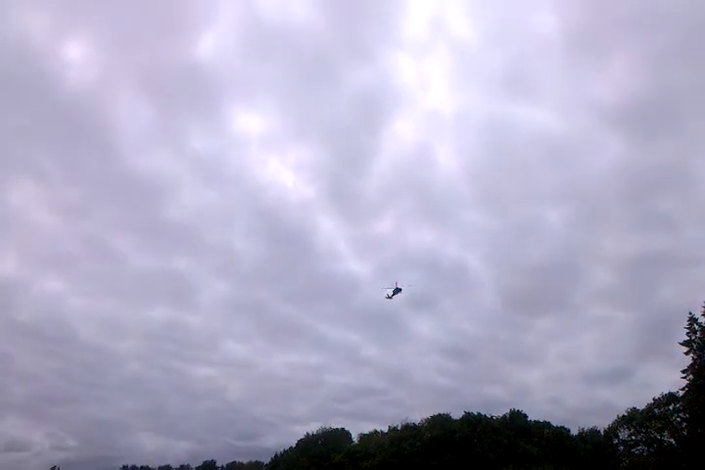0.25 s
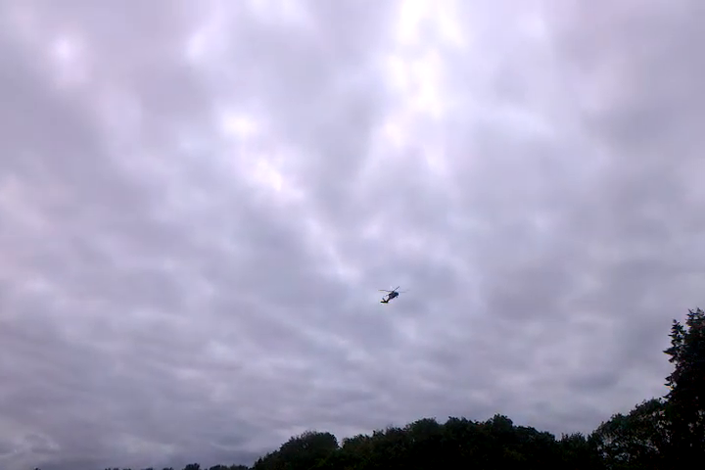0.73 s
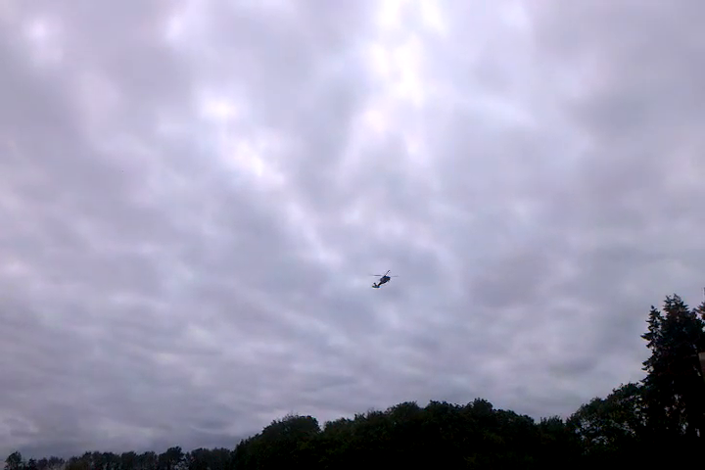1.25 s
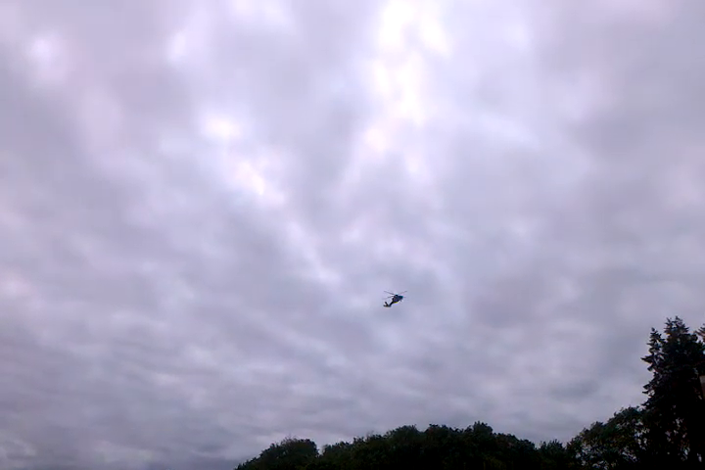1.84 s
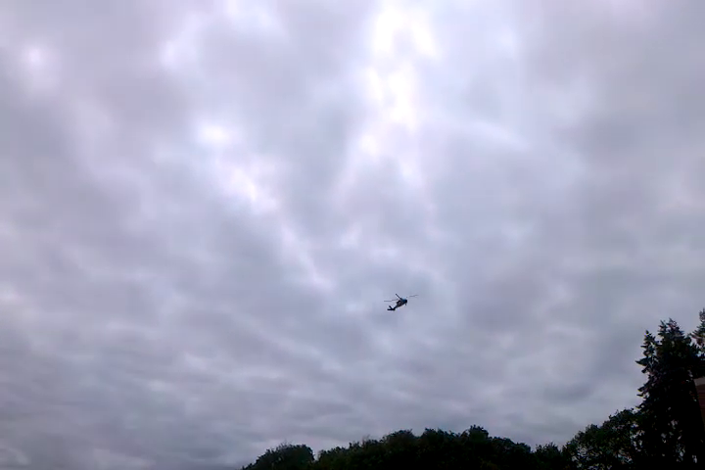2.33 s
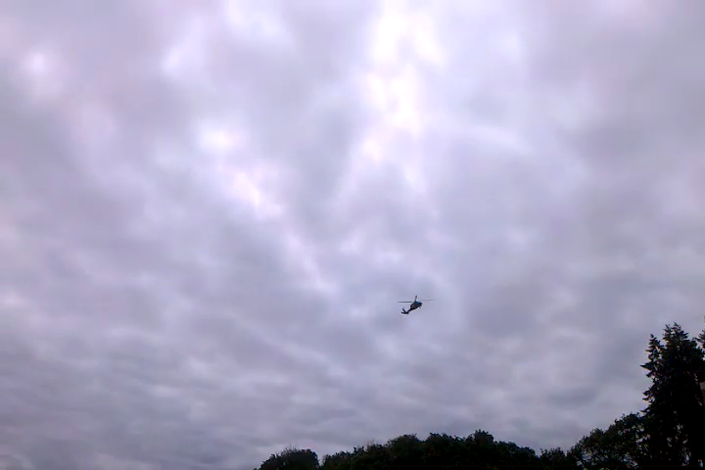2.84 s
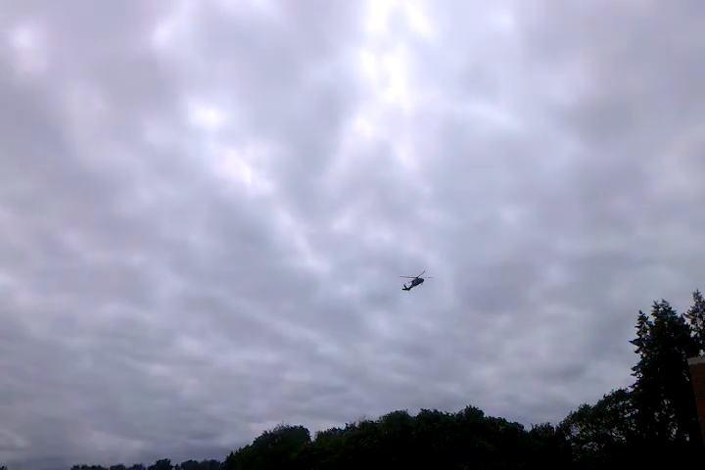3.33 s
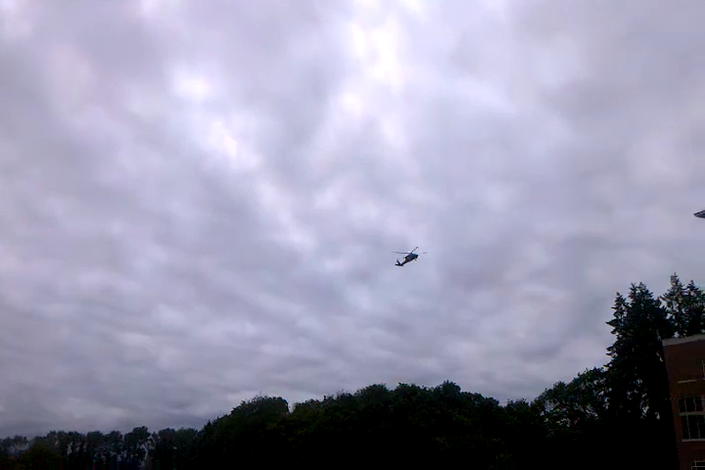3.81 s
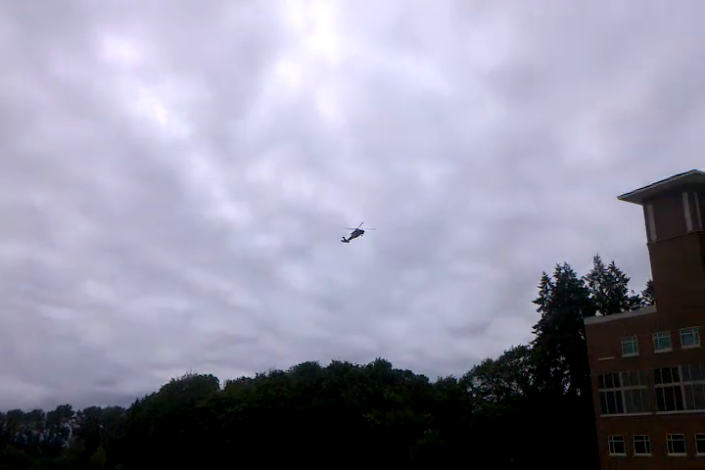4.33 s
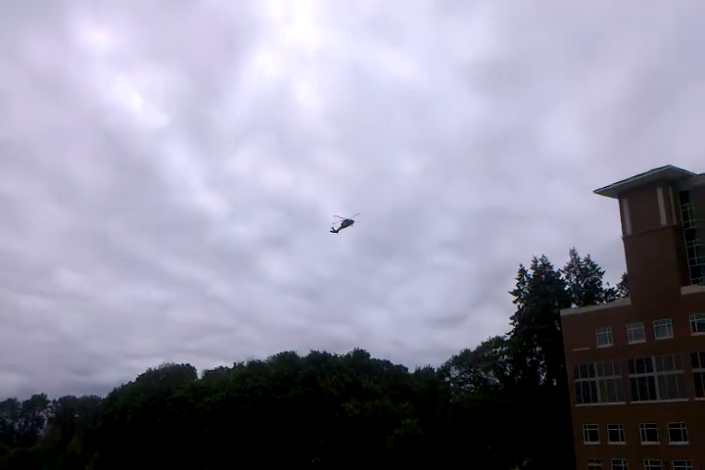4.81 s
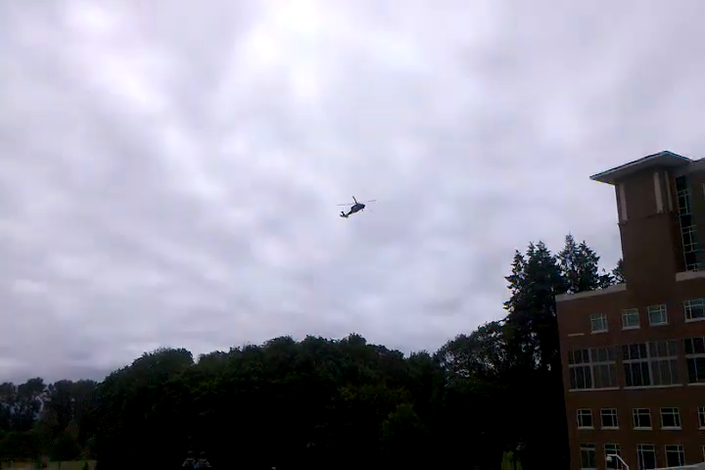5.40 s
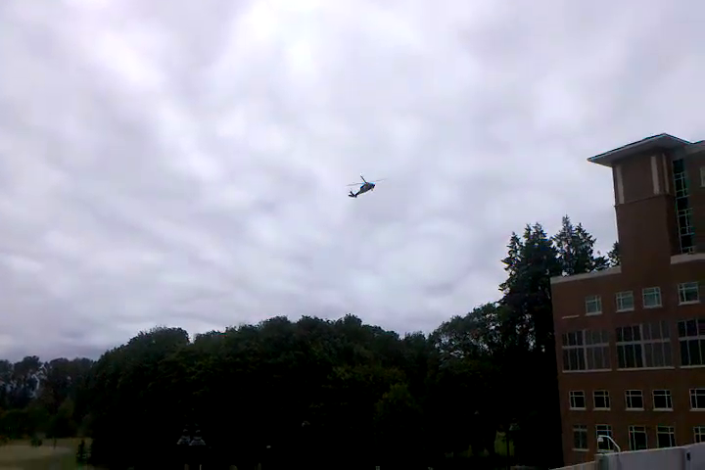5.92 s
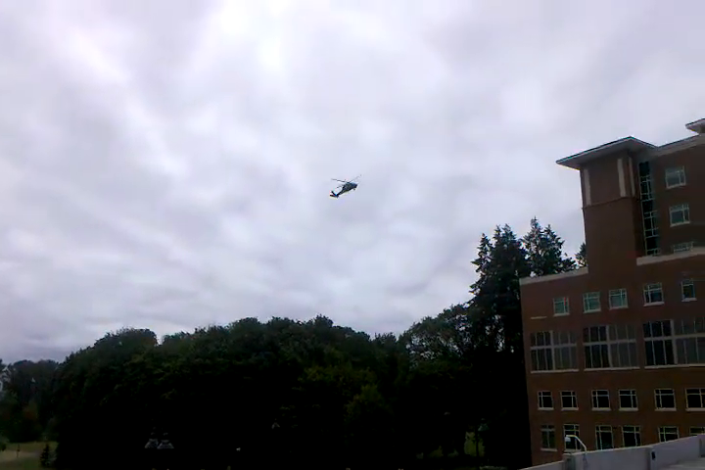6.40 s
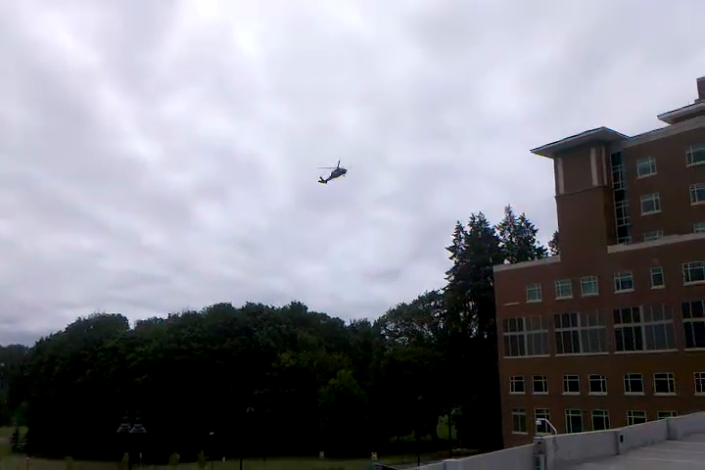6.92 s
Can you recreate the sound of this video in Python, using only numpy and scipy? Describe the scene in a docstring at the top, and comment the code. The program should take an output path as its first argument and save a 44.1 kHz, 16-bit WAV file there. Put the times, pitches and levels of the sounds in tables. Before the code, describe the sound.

Rapid helicopter blade thumps grow louder and sharper as it draws nearer outdoors, with rushing air, low rumble and a faint whine.

```python
"""A four-bladed helicopter comes slowly nearer under cloud and hovers beside a tall building.
Each blade pass sends a thump; where a blade cuts the vortex of the one before, it sharpens into
a slap and a rasp. Rotor wash, exhaust roar, hiss and a thin turbine whine fill the gaps over a low
rumble; the ground, trees and walls answer. Light air brushes the microphone, and two faint scuffs pass."""
import sys
import numpy as np
from scipy import signal
from scipy.fft import rfft, irfft, next_fast_len
from scipy.io import wavfile
from scipy.ndimage import uniform_filter1d, map_coordinates

SR = 44100
rng = np.random.default_rng(int(sys.argv[2]) if len(sys.argv) > 2 else 0)


def transcribe(u):
    """Save the signal u as a 16-bit wav file named by the first command-line argument.

    u: samples, shape (n,) or (channels, n), limited to [-1, 1]; the rate is SR.
    q: integer samples, one column per channel.
    """
    v = np.clip(np.atleast_2d(u).T, -1, 1)
    q = np.round(v * 32767).astype(np.int16)
    wavfile.write(sys.argv[1], SR, q)


N = 315315

BLADE_HZ, FIRST_PASS_S = 18.067, .0485
# Travel time to the listener. Each row: time in seconds, delay in ms relative to the close hover.
TRAVEL_DELAY = [(0, 26.3), (1.5, 9), (2.4, .8), (3, -1), (4.4, 1.2), (5.2, .5), (6, 1), (6.5, 4),
                (7.15, 11)]
# The four blades track unevenly. Each row is one blade: loading offset in dB, slap offset in dB.
BLADE_OFFSETS = [(-1, -1.5), (-7.5, -0.5), (0, -2), (-1.6, -1.5)]
# The beat limps most while far away. Each row: time in seconds, multiplier on the loading offsets.
UNEVENNESS = [(0, 1.5), (2.5, 1.2), (3.5, 0.29), (7.15, 0.4)]
# How strongly the rotor carries. Each row: time in seconds, base levels in dB of beat, wash and rumble.
ROTOR_LEVELS = [(0.15, -35, -32, -46.5), (.42, -34.5, -36.5, -49), (.85, -33.5, -35, -44.5),
                (1.7, -33.5, -35.5, -54.5), (2.3, -35.5, -36.5, -48.5), (2.65, -32.5, -35, -47),
                (3.15, -36.5, -37.5, -45), (3.8, -30.5, -30.5, -42), (4.3, -32.5, -31.5, -44.5),
                (4.7, -29.5, -30, -45.5), (5.45, -28.5, -28, -40.5), (5.97, -29, -27.5, -38.5),
                (6.15, -33, -31.5, -37.5), (6.38, -35.5, -32.5, -37.5), (6.7, -36, -34.5, -43.5),
                (7.15, -32, -33.5, -42.5)]


def amp(db):
    return 10 ** (np.asarray(db) / 20)


def unit_rms(x):
    return x / np.sqrt(np.mean(x ** 2) + 1e-20)


def along(points, hz):
    """Read (Hz, value) points on a log frequency axis."""
    point_hz, values = np.transpose(points)
    return np.interp(np.log(hz + 1), np.log(point_hz + 1), values)


def curves(rows, at=None):
    """Each column after the time, at the given times or at every sample."""
    times, *columns = np.transpose(rows)
    return [np.interp(np.arange(N) / SR if at is None else at, times, column) for column in columns]


def wobble(knots_per_s):
    """A smooth random curve."""
    knots = rng.standard_normal(int(N * knots_per_s / SR) + 4)
    return map_coordinates(knots, [np.arange(N) * knots_per_s / SR])


def filtered(x, response):
    """Shape x by a gain given as a function of Hz."""
    size = next_fast_len(N + SR // 2)
    return irfft(rfft(x, size) * response(np.fft.rfftfreq(size, 1 / SR)), size)[:N]


def rush(spectrum, patchy_db):
    """Noise of rms 1, coloured by (Hz, dB) points, with drifting patches of random gain."""
    bins = signal.stft(rng.standard_normal(N), nperseg=1024)[2]
    patches = uniform_filter1d(rng.standard_normal(bins.shape), size=4, axis=0)
    patches = uniform_filter1d(patches, size=12, axis=1)
    noise = signal.istft(bins * amp(patchy_db * unit_rms(patches)), nperseg=1024)[1][:N]
    return unit_rms(filtered(noise, lambda hz: amp(along(spectrum, hz))))


def spells(rows, at, attack_s=.14, release_s=.1):
    """A gain for each dB column: every spell fades in, holds from start to end and lets go."""
    start, end, *levels_db = np.transpose(rows)[:, :, None]
    gate = np.clip(1 + (at - start) / attack_s, 0, 1) * np.clip(1 - (at - end) / release_s, 0, 1)
    return [(amp(db) * gate).max(0) for db in levels_db]


def pulse_of(gain, causal_share, lead):
    """A pulse for each row of spectral gains: a brief build, a peak at sample lead, then a ring."""
    cepstrum = irfft(np.log(gain + 1e-7))
    half = cepstrum.shape[1] // 2
    cepstrum[:, 1:half] *= 1 + causal_share
    cepstrum[:, half + 1:] *= 1 - causal_share
    return np.roll(irfft(np.exp(rfft(cepstrum))), lead, axis=1)


def pass_times():
    """When each blade pass arrives; the shrinking distance hurries the beat."""
    sent = FIRST_PASS_S + np.arange(int(N / SR * BLADE_HZ)) / BLADE_HZ
    return sent + curves(TRAVEL_DELAY, sent)[0] / 1000


def swell(lag_s, width_s):
    """A bell-shaped envelope that rises once a blade pass, lag_s behind the thump."""
    sent = np.arange(N) / SR - curves(TRAVEL_DELAY)[0] / 1000
    passes = (sent - FIRST_PASS_S - lag_s) * BLADE_HZ
    return np.exp(-.5 * ((passes - np.round(passes)) / BLADE_HZ / width_s) ** 2)


def blade_levels(times):
    """Thump, slap and crack in dB and the crack's top edge in Hz; cutting the vortex hardens a pass."""
    # Blades cut the vortex. Each row: start and end in seconds, slap and crack levels in dB.
    bites = [(.66, 1.2, -51, -35.5), (1.25, 1.62, -53, -36), (1.85, 2.35, -36, -40),
             (2.6, 3.08, -31.5, -38), (3.25, 3.53, -24.5, -34.5), (3.59, 3.76, -23.5, -32),
             (3.81, 3.92, -21.5, -32.5), (4.2, 4.42, -28, -37.5), (4.58, 4.87, -26.5, -33),
             (4.95, 5.28, -21, -32.5), (5.33, 5.66, -28.5, -33), (5.7, 5.95, -28, -39),
             (6.45, 7.15, -47.5, -35.5)]
    # Square or glancing hits. Each row: time in seconds, extra dB of thump, slap and crack.
    accents = [(3.369, -2, 1.5, 3.5), (3.535, -0.5, 0.5, 2.5), (3.702, 1, 2.5, 3), (3.923, -6, 1.5, -1),
               (4.145, -3.5, 7, 8), (4.367, -0.5, 4.5, 4.5), (4.588, 3.5, 1.5, 3), (4.699, 1, 1.5, 1),
               (4.754, 4, -0.5, 2.5), (4.809, 0.5, 3, 2.5), (4.975, -0.5, -3, 7), (5.141, 1, -0.5, 7),
               (5.197, 1.5, 1.5, 2), (5.307, 0, 2.5, -2), (5.529, 4, 1, 3.5), (5.584, 0, -11.5, -1),
               (5.640, 6, -2, 3), (5.695, -10, 2, 2.5), (5.750, 5.5, -1.5, 3), (5.806, -6, -3.5, 0.5),
               (5.861, -2.5, 2, 5.5), (5.916, 1, -0.5, 5.5), (5.972, 6.5, 4.5, -1)]
    blade_load, blade_slap = np.array(BLADE_OFFSETS)[np.arange(len(times)) % len(BLADE_OFFSETS)].T
    load_db = curves(ROTOR_LEVELS, times)[0] + blade_load * curves(UNEVENNESS, times)[0]
    clean_thump_db, clean_slap_db, clean_crack_db = load_db - 2.5, load_db - 1.5, load_db - 8
    slap_bite, crack_bite = spells(bites, times)
    slap_db = 20 * np.log10(np.hypot(amp(clean_slap_db), slap_bite))
    crack_db = 20 * np.log10(np.hypot(amp(clean_crack_db), crack_bite))
    thump_db = clean_thump_db - .29 * (slap_db - clean_slap_db)  # the thump yields as the slap grows
    edge_hz = 783 * 2 ** (.03 * (crack_db + 36.5))  # a harder crack reaches higher
    accent_s, *extras_db = np.transpose(accents)
    accent_db = np.array(extras_db) @ (np.abs(times - accent_s[:, None]) < .5 / BLADE_HZ)
    return np.array([thump_db, slap_db + blade_slap, crack_db + blade_slap]) + accent_db, edge_hz


def blade_pulses(scatter_db=.35, ripple_db=1.5, ripple_hz=600, jitter_s=.00025, size=4096):
    """One pressure pulse a blade: a round thump, steepened by the vortex into slap and crack."""
    # The three tones of a pulse. Each row: frequency in Hz, relative level in dB.
    thump_tone = [(20, -81.5), (36, -40.5), (54, -35), (70, -28.5), (90, -6), (112, -2), (148, 4),
                  (185, 0.5), (260, -12.5), (500, -47.5), (1500, -110)]
    slap_tone = [(40, -82.5), (120, -47), (188, 0.5), (235, 4), (300, 0.5), (340, -4), (385, -11),
                 (520, -25.5), (900, -35), (4000, -110)]
    crack_tone = [(100, -63), (400, -12), (620, 5.5), (745, 5), (860, -4.5), (1000, 1.5), (1130, 5.5),
                  (1320, -11.5), (1600, -9), (2500, -21.5), (7000, -85.5)]
    # The angle to the rotor shifts the tone. Each row: time in seconds, slap and crack pitch ratios.
    pitch_ratios = [(0, 0.81, .95), (.8, 1.23, .98), (2, 1.02, .93), (2.6, 0.97, .97), (3.7, 1.023, .98),
                    (4.5, 1.02, 1.03), (5.2, 1.037, 1), (5.7, 1.08, 1), (6.4, 1.31, 1.12)]
    times = pass_times()
    hz = np.fft.rfftfreq(size, 1 / SR)
    (thump_db, slap_db, crack_db), edge_hz = blade_levels(times)
    slap_pitch, crack_pitch = curves(pitch_ratios, times[:, None])
    chance_db = scatter_db * rng.standard_normal((len(times), 3)).T
    thump = np.outer(amp(thump_db + .5 * chance_db[0]), unit_rms(amp(along(thump_tone, hz))))
    slap = amp(slap_db + chance_db[1])[:, None] * unit_rms(amp(along(slap_tone, hz / slap_pitch)))
    crack = amp(crack_db + chance_db[2])[:, None] * unit_rms(amp(along(crack_tone, hz / crack_pitch)))
    crack /= np.sqrt(1 + (hz / edge_hz[:, None]) ** 6)
    # Turbulent air colours the short waves of every pulse differently and leaves the long ones alone.
    ripple = signal.fftconvolve(rng.standard_normal(slap.shape), np.hanning(24)[None], mode="same")
    colour = amp(ripple_db * unit_rms(ripple) * hz / (hz + ripple_hz))
    lead = size // 2
    pulses = -pulse_of((thump + slap + crack) * colour, causal_share=.57, lead=lead)
    pulses = stray_paths(pulses * np.sqrt(SR / BLADE_HZ), times)
    starts = np.round((times + jitter_s * rng.standard_normal(len(times))) * SR).astype(int)
    positions = starts[:, None] + np.arange(size)
    return np.bincount(positions.ravel(), pulses.ravel(), N + size)[lead:lead + N]


def stray_paths(pulses, times, lag_s=.0014, width_s=.0035, above_hz=227, evenness=.8):
    """Eddies spread each pulse into a short cluster of equal energy; long waves bend around them."""
    # The hardest bite arrives cleanest. Each row: time in seconds, share of the highs that strays.
    smear = [(0, .9), (3, .85), (3.5, .5), (4.4, .45), (4.9, .15), (5.17, .15), (5.3, .5), (5.55, .25),
             (5.9, .3), (6.2, .8)]
    size = pulses.shape[1]
    hz = np.fft.rfftfreq(size, 1 / SR)
    late_s = np.fft.fftfreq(size) * size / SR - lag_s
    paths = rng.standard_normal(pulses.shape) * np.exp(-.5 * (late_s / width_s) ** 2)
    paths = rfft(paths / np.linalg.norm(paths, axis=1, keepdims=True))
    share = np.outer(curves(smear, times)[0], hz ** 4 / (hz ** 4 + above_hz ** 4))
    air = np.sqrt(1 - share) + np.sqrt(share) * paths
    air /= np.hypot(np.abs(air), .1) ** evenness  # keeps much the same tone
    cluster = irfft(rfft(pulses) * air)
    cluster /= np.linalg.norm(cluster, axis=1, keepdims=True)
    return cluster * np.linalg.norm(pulses, axis=1, keepdims=True)


def ground_bounce(x, dull_hz):
    """A duller bounce off the ground doubles the direct sound and hollows its tone."""
    # Each row: time in seconds, bounce level in dB against the direct sound, delay in ms.
    reflection = [(0, -8.5, 6.2), (2.8, -8.5, 6.5), (3.6, -8.5, 6.62), (5.1, -9, 6.7), (5.8, -11.5, 6.75),
                  (6.4, -7, 6.85), (7.15, -6, 6.95)]
    strength_db, delay_ms = curves(reflection)
    t = np.arange(N) / SR
    dulled = filtered(x, lambda hz: 1 / (1 + (hz / dull_hz) ** 2))
    bounce = np.interp(t - delay_ms / 1000, t, dulled)
    return (x + amp(strength_db) * bounce) / np.hypot(1, amp(strength_db))


def vortex_rasp(floor_db=-53.5):
    """A short rasp of torn air trails each thump and flares when the tip vortex tears."""
    # Torn air. Each row: frequency in Hz, relative level in dB.
    rasp_tone = [(500, -18), (980, -1), (1380, -1), (1600, 3), (1900, -4), (2350, 3), (2650, -3.5),
                 (3000, -11), (4200, -18), (7000, -40.5), (7800, -69)]
    # Spells of tearing. Each row: start and end in seconds, level in dB.
    tears = [(2.3, 2.88, -47.5), (4.95, 5.2, -51), (5.27, 5.48, -33), (5.53, 5.70, -42),
             (6.75, 7.15, -49.5)]
    strength = np.hypot(amp(floor_db), spells(tears, np.arange(N) / SR)[0])
    return strength * unit_rms(rush(rasp_tone, patchy_db=.5) * swell(lag_s=.005, width_s=.003))


def surroundings(x, patterns=16):
    """Scatter from trees and walls; its pattern changes as the helicopter drifts."""
    # Each row: frequency in Hz, seconds for the tail to fall 60 dB.
    decay_times = [(100, 0.13), (500, 0.55), (3000, 0.39)]
    hz, t, bins = signal.stft(rng.standard_normal((patterns, SR // 2)), SR, nperseg=256)
    tails = signal.istft(bins * amp(-60 * t / along(decay_times, hz)[:, None]), SR, nperseg=256)[1]
    tails /= np.linalg.norm(tails, axis=1, keepdims=True)
    place = np.linspace(0, patterns - 1, N) - np.arange(patterns)[:, None]
    crossfade = np.sqrt(np.clip(1 - np.abs(place), 0, 1))
    return signal.fftconvolve(x * crossfade, tails, axes=1).sum(0)[:N]


def rotor(scatter_db=-7, scatter_db_per_s=-.7):
    """The blade beat and its rasp, drying out as the helicopter nears."""
    direct = ground_bounce(blade_pulses(), dull_hz=2200) + vortex_rasp()
    scatter = amp(scatter_db + scatter_db_per_s * np.arange(N) / SR)
    return (direct + scatter * surroundings(direct)) / np.hypot(1, scatter)


def rotor_wash():
    """The wash pulses with the blades; a weak blade stirs less air."""
    # Stirred air. Each row: frequency in Hz, relative level in dB.
    wash_tone = [(20, -71), (45, -40.5), (75, -21.5), (110, -10.5), (150, -2), (215, 4), (350, 2),
                 (410, -5), (670, -11.5), (1000, -19), (2500, -68)]
    _, wash_db, _ = curves(ROTOR_LEVELS)
    times = pass_times()
    loading_db = np.resize(np.array(BLADE_OFFSETS)[:, 0], len(times)) * curves(UNEVENNESS, times)[0]
    stir = amp(.17 * np.interp(np.arange(N) / SR, times, loading_db))
    wash = rush(wash_tone, patchy_db=1.08) * stir * (1 + .55 * swell(lag_s=.001, width_s=.0065))
    return amp(wash_db) * unit_rms(ground_bounce(wash, dull_hz=490))


def exhaust_and_hiss(roar_trim_db=3, hiss_trim_db=.5, sheen_trim_db=2):
    """The exhaust roar throbs with the blades under a smooth hiss and a finer sheen."""
    # The three noise colours. Each row: frequency in Hz, relative level in dB.
    roar_tone = [(150, -28), (400, 0.5), (700, 5), (860, 2.5), (1080, 3.5), (1320, 1), (1600, 1),
                 (1820, -2.5), (2150, -0.5), (2580, -1.5), (2900, -11), (4000, -55.5)]
    hiss_tone = [(1500, -36.5), (2600, -2), (3200, 1.5), (3700, -0.5), (4050, -3), (4550, -6.5),
                 (5200, -29.5), (7000, -39.5), (7800, -73)]
    sheen_tone = [(3000, -37), (4200, -6.5), (4700, -0.5), (5300, -4), (5950, -6.5), (6300, -9),
                  (6850, -11), (7300, -27), (7800, -42.5)]
    # Each row: time in seconds, then roar, hiss and sheen in dB before their trims.
    faders = [(0.05, -38.5, -47.5, -55), (0.38, -39, -49, -58.5), (0.64, -38, -46.5, -57),
              (1.72, -38.5, -49, -57.5), (2.17, -38, -47.5, -59), (2.37, -37.5, -47, -55),
              (3.84, -38.5, -46, -57), (4.45, -39.5, -44.5, -55.5), (5.19, -37, -45.5, -55),
              (5.47, -39.5, -45.5, -54.5), (5.76, -40, -47, -56), (7.1, -39.5, -44, -52.5)]
    roar_db, hiss_db, sheen_db = curves(faders)
    throb = 1 + .32 * swell(lag_s=.001, width_s=.0035)
    roar = unit_rms(rush(roar_tone, patchy_db=.7) * throb)
    roar *= amp(roar_db + roar_trim_db + .49 * wobble(13))
    hiss = amp(hiss_db + hiss_trim_db) * rush(hiss_tone, patchy_db=1.14)
    sheen = amp(sheen_db + sheen_trim_db + .6 * wobble(5.5)) * rush(sheen_tone, patchy_db=1.5)
    return roar + hiss + sheen


def rumble():
    """The rotor's low rumble, a smooth bed under the beat."""
    # Each row: frequency in Hz, relative level in dB.
    rumble_tone = [(25, -32), (55, -16), (80, -4.5), (110, 1), (150, -0.5), (220, -19.5), (500, -82)]
    _, _, rumble_db = curves(ROTOR_LEVELS)
    return amp(rumble_db) * rush(rumble_tone, patchy_db=-1)


def whine(rows, width_hz):
    """One turbine line, blurred and wavering in level on its way through the air."""
    pitch_hz, level_db = curves(rows)
    phase = 2 * np.pi * np.cumsum(pitch_hz) / SR
    blur = filtered(rng.standard_normal(N), lambda hz: 1 / (1 + (hz / width_hz) ** 2))
    line = blur * np.cos(phase) + np.roll(blur, N // 2) * np.sin(phase)
    return amp(level_db) * unit_rms(line * amp(.76 * wobble(5.9)))


def turbine():
    """A thin compressor line sings between two breathier ones."""
    # The three lines. Each row: time in seconds, pitch in Hz, level in dB.
    compressor = [(1.8, 3810, -76), (3.2, 3815, -58), (4.45, 3818, -57.5), (4.75, 3798, -57.5),
                  (6.5, 3795, -56.5), (7.15, 3880, -58)]
    upper = [(0, 4440, -60), (2.1, 4440, -60), (2.4, 4510, -59), (3.1, 4510, -60), (3.6, 4530, -65),
             (5.5, 4530, -65), (6.3, 4580, -61), (7.15, 4620, -62)]
    lower = [(0, 3170, -61), (6.4, 3270, -61), (7.15, 3350, -52)]
    return whine(compressor, width_hz=18) + whine(upper, width_hz=55) + whine(lower, width_hz=55)


def breeze(puff_at_s=7, rise_s=.08, fall_s=.1):
    """Light air brushes the microphone and freshens, with one brief puff."""
    air_tone = [(15, -39.5), (28, -10.5), (48, -3), (80, 1.5), (200, -20), (800, -83.5)]
    t = np.arange(N) / SR
    puff = amp(-47) * np.exp(-np.maximum((puff_at_s - t) / rise_s, (t - puff_at_s) / fall_s))
    light_air = amp(-69.5 + t)  # up 1 dB a second
    return (light_air + puff) * rush(air_tone, patchy_db=-1.5)


def scuffs(width_s=.0064):
    """Two brief dry scuffs, barely above the roar."""
    # Each row: time in seconds, level at the crest in dB.
    cues = [(0.102, -29.5), (2.932, -32)]
    scuff_tone = [(500, -5.5), (1500, -1), (2400, 3.5), (3200, -9), (7000, -66.5)]
    t = np.arange(N) / SR
    bursts = sum(amp(db) * np.exp(-.5 * ((t - at_s) / width_s) ** 2) for at_s, db in cues)
    return bursts * rush(scuff_tone, patchy_db=3.5)


def scene():
    helicopter = rotor() + rotor_wash() + exhaust_and_hiss() + rumble() + turbine()
    return (helicopter + breeze() + scuffs())[None]


def record(dry):
    """The microphone hollows the tone, drops the deepest bass and keeps nothing above its band limit."""
    # One bump and several dips in the tone. Each row: centre in Hz, width in Hz, gain in dB.
    bells = [(416, 33, 2), (515, 59, 0), (850, 69, -2), (1360, 90, -2), (4030, 130, -1), (5520, 72, -1.5),
             (5920, 90, -2.5)]
    low_hz, top_hz = 40, 7822

    def response(hz):
        tone_db = sum(db * np.exp(-.5 * ((hz - centre) / width) ** 2) for centre, width, db in bells)
        low_cut = hz ** 4 / np.hypot(hz ** 4, low_hz ** 4)
        return amp(tone_db) * low_cut * (hz < top_hz)

    return filtered(dry[0], response)[None]


dry = scene()
out = record(dry)
transcribe(out)
```